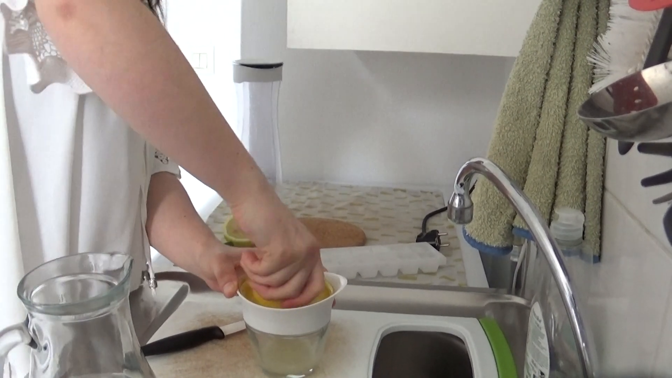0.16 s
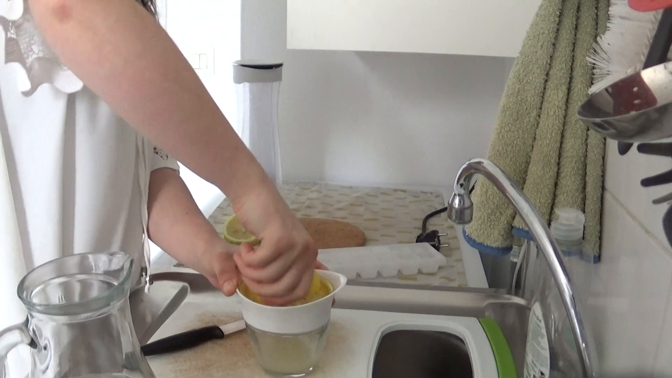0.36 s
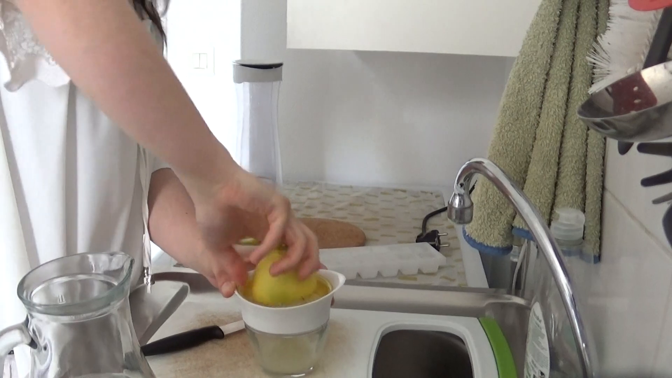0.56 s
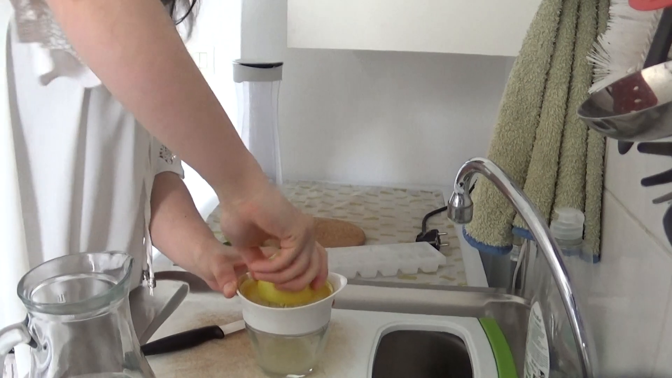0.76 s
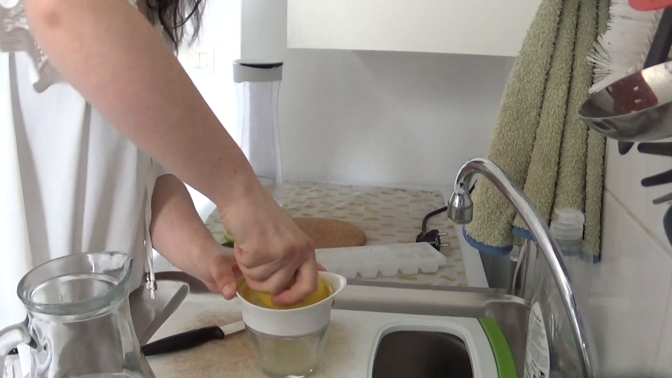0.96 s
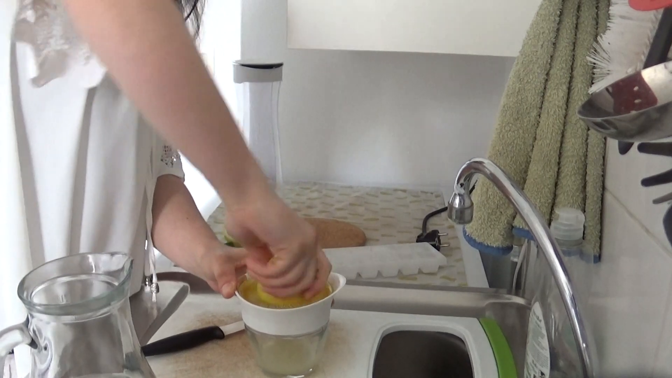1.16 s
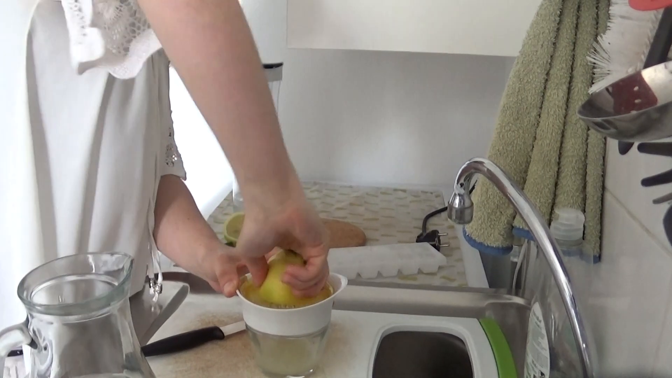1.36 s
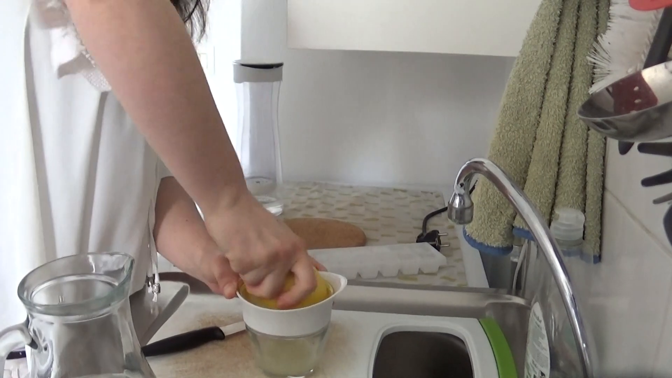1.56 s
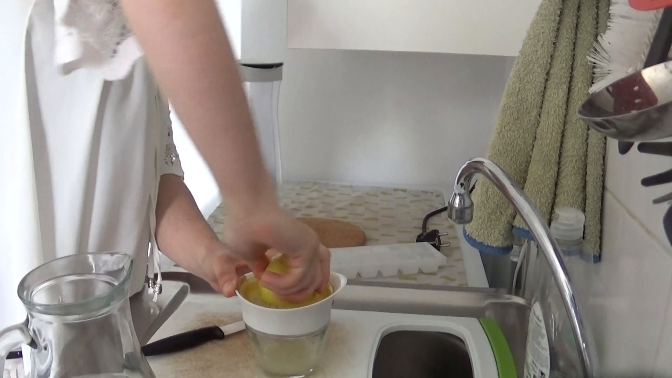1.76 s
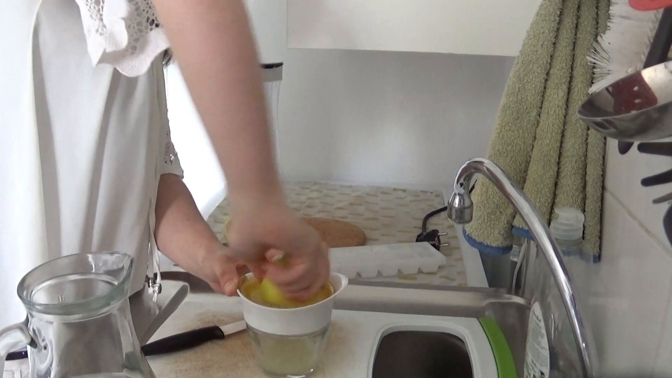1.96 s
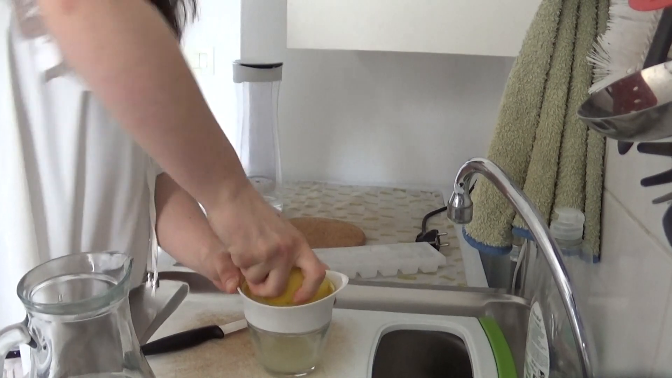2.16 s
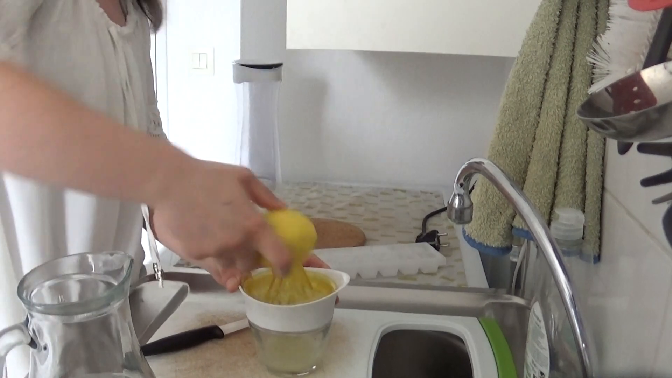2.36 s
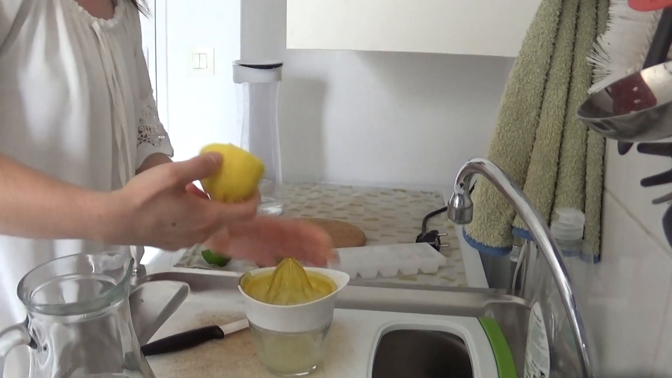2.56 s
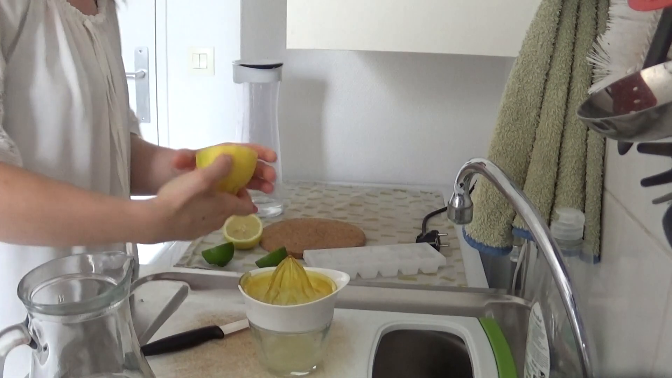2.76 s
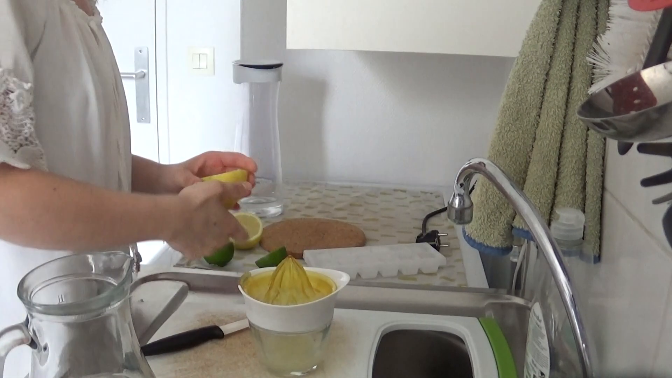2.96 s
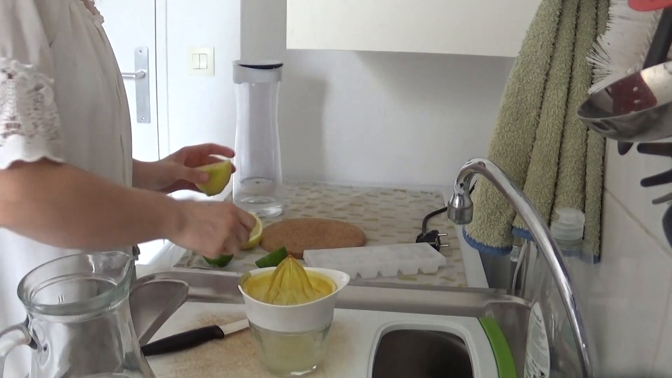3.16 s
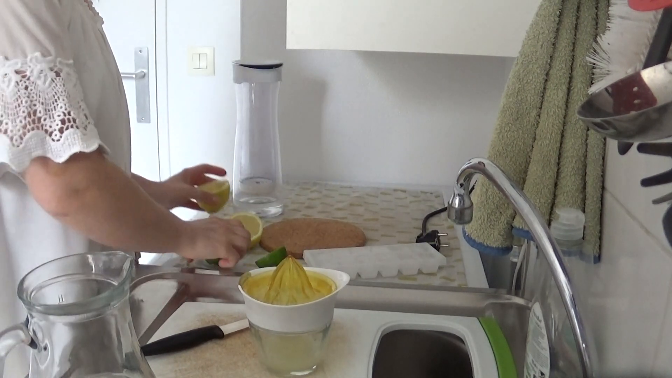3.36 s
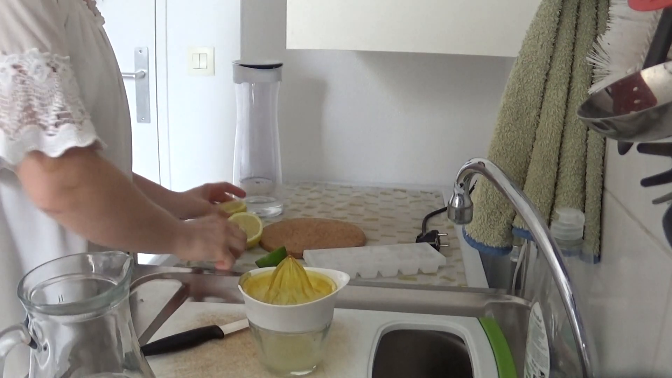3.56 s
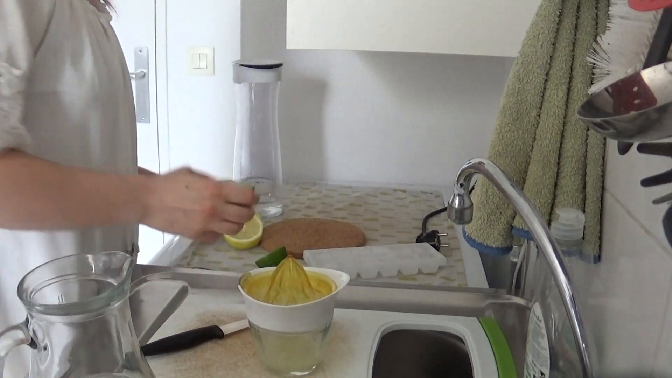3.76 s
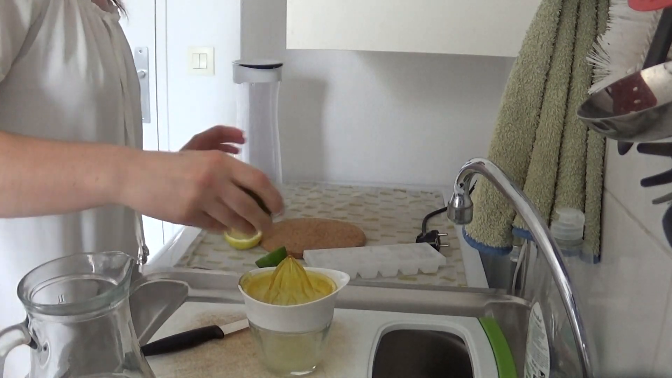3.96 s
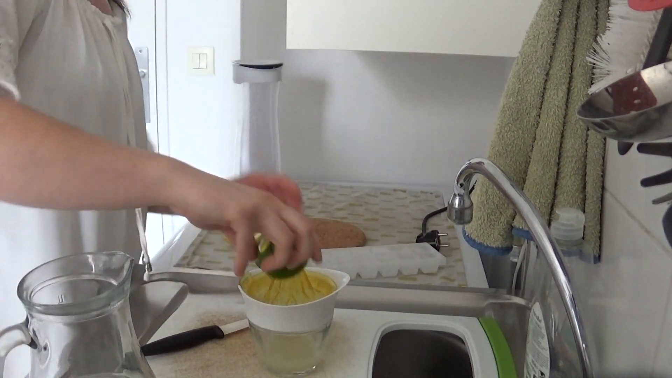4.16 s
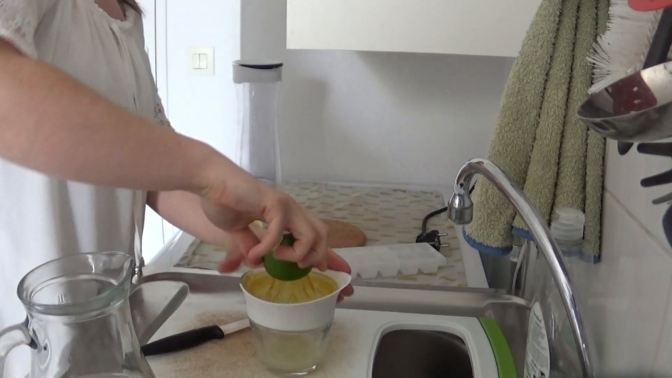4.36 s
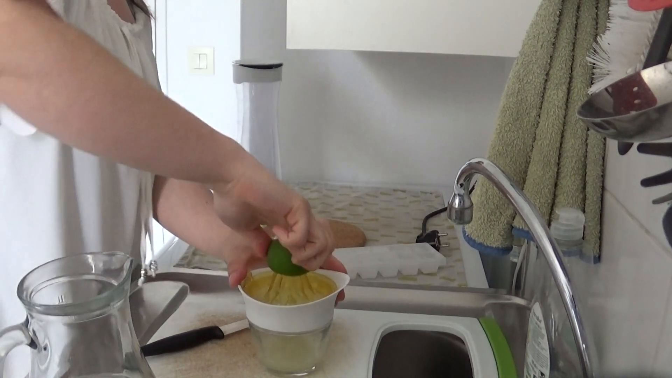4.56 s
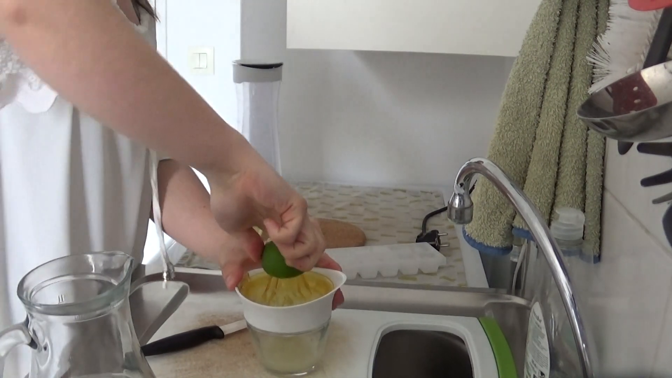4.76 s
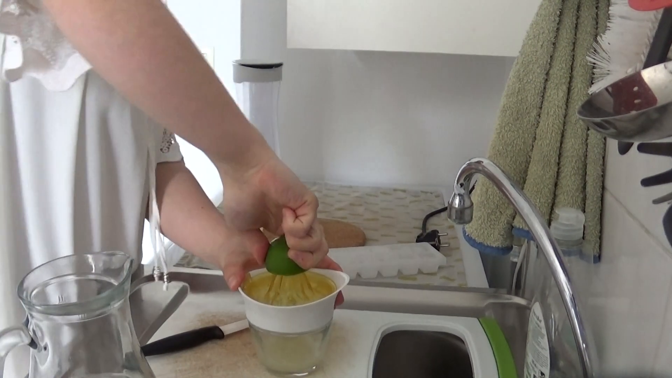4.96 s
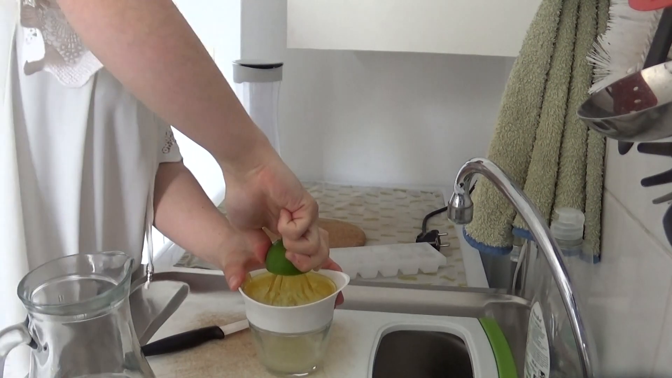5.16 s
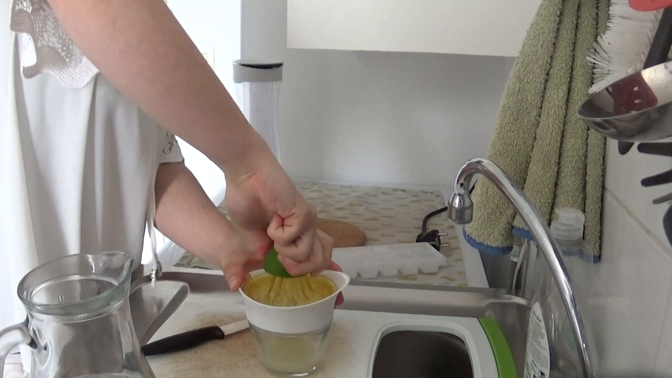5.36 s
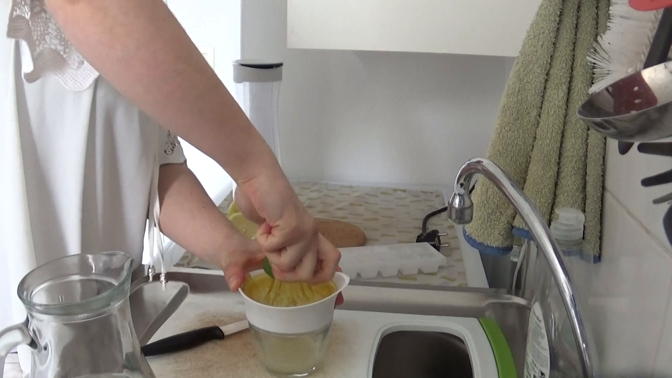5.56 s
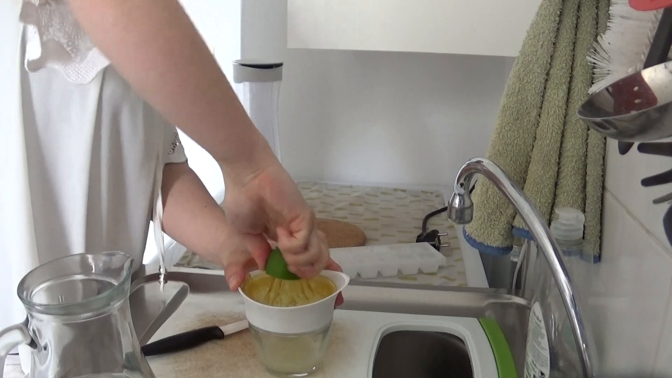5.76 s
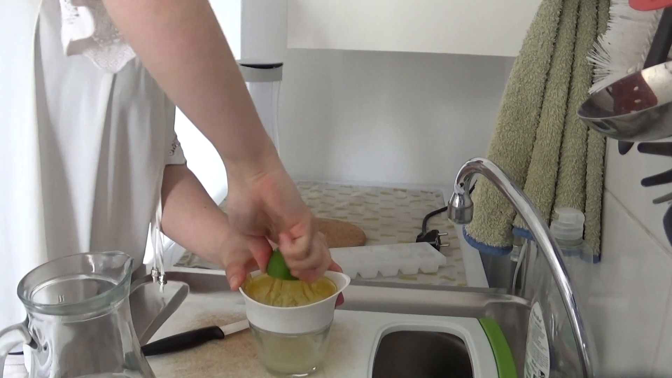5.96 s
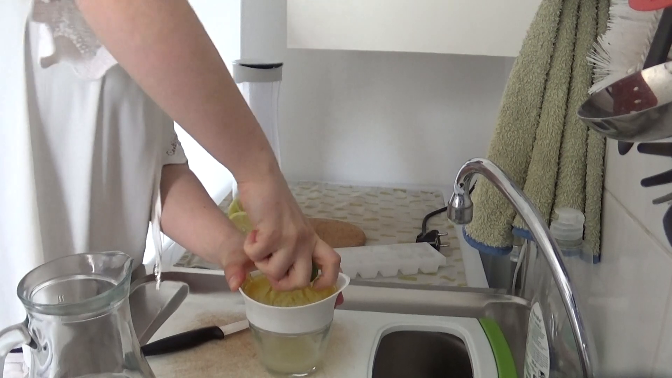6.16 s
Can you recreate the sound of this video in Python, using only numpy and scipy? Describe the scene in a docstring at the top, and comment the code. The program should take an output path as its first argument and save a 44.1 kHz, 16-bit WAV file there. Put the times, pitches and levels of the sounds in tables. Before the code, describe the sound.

A close stereo microphone in a small, short-echoing kitchen picks up a soft room hush, a barely audible thin whistle and faint, very rapid, even high ticking. From 0 to about 2.3 s, a lemon half is twisted on a plastic juicer over a glass in quick, uneven strokes: wet squelches, fizzy squirts and bubble pops over low worktop and glass bumps. Soft thuds land around 0.2, 0.7 and 0.9 s; the juiciest stroke comes near 1.4 s, with a loud sharp snap at 1.55 s. Squishing fades by 2.4 s, leaving a small tap and faint rustle around 2.5 s. At 3.6 s the spent half drops with a strong, hollow thud. Light handling bumps follow from 3.9 to 4.6 s. From 4.75 s to the end at roughly 6 s, a hard lime grips and slips in dry plastic clicks and glassy rattles, densest and loudest after 5.2 s, with slight wetness and a late knock near 6.1 s.

```python
"""Citrus pressed by hand

Citrus halves are twisted on a plastic juicer that stands on a glass in a small kitchen: a soft lemon, then a hard lime.
Pulp squishes as trains of short rising bubble tones; pops and faint rustles add tones and puffs of noise.
The rind bumps and slips over the ribs, ringing worktop, glass and plastic as dying sines; a spent half is dropped.
Under it lie a hush of shaped noise, a faint whistle that comes and goes and a steady ticking."""
import sys
import numpy as np
from scipy import signal
from scipy.io import wavfile
from scipy.ndimage import uniform_filter1d

SR = 44100
rng = np.random.default_rng(int(sys.argv[2]) if len(sys.argv) > 2 else 0)


def put_to_file(sound):
    """Save the sound as 16-bit audio at rate SR, in the file named by the first command-line argument."""
    columns = np.atleast_2d(sound).T  # one column per channel
    safe = np.clip(columns, -1, 1)
    whole_steps = np.round(safe * 32767)
    wavfile.write(sys.argv[1], SR, whole_steps.astype(np.int16))


def elevation(decibels):
    """Turn decibel levels (scalar or array-like) into linear amplitude ratios."""
    levels = np.asarray(decibels, float)
    return 10 ** (levels / 20)


N = 274302  # length [samples]


def evened(x):
    """Scales to rms 1."""
    return x / np.sqrt(np.mean(x ** 2) + 1e-20)


def read(points, hz):
    """Reads a spectrum table on a log-frequency axis."""
    f, value = np.transpose(points)
    return np.interp(np.log(hz + 1), np.log(f + 1), value)


def add(mix, s, sound):
    """Mixes a sound in at s seconds."""
    part = mix[round(s * SR):][:len(sound)]
    part += sound[:len(part)]


def wander(step):
    """A slow random curve with a fresh normal value every step samples."""
    return np.interp(np.arange(N), np.arange(0, N + step, step), rng.standard_normal(N // step + 2))


def paired(shape, likeness, size):
    """Two channels of noise from a bins x frames magnitude, alike as far as the table says."""
    a, b, c, d = rng.standard_normal((4,) + shape.shape[::-1]).transpose(0, 2, 1)
    same = np.clip(read(likeness, np.fft.rfftfreq(size, 1 / SR)), 0, 1)[:, None]
    mid = np.sqrt(1 + same) * (a + 1j * b)
    side = np.sqrt(1 - same) * (c + 1j * d)
    return signal.istft(np.array([mid + side, mid - side]) * shape, nperseg=size)[1]


def clicks(per_s, spread_db):
    """Sparse random clicks of either sign; a few are large."""
    chance, size, sign = rng.random((3, N))
    strength = elevation(spread_db * np.minimum(-np.log(size + 1e-9), 4))
    return (chance < per_s / SR) * strength * np.sign(sign - 0.5)


def ring(modes, damping):
    """Dying sines of a struck body, all starting from rest; damping shortens every decay."""
    t = np.arange(SR // 2) / SR
    return -sum(elevation(db - 60 * t * damping / t60) * np.sin(2 * np.pi * hz * t) for hz, db, t60 in modes)


def shaken(modes, per_s, spread_db, soft, damping):
    """Random bumps, rounded over soft samples, ring a body at a steady mean level."""
    bumps = signal.oaconvolve(clicks(per_s, spread_db), signal.windows.hann(soft))[:N]
    rung = signal.oaconvolve(bumps, ring(modes, damping))[:N]
    return rung / np.sqrt(uniform_filter1d(rung ** 2, 8000) + 1e-12)


def bubble(hz, turns, glide):
    """A few dying cycles; glide raises the pitch as the bubble opens."""
    u = np.arange(int(3 * turns * SR / hz) + 8) * hz / SR / turns
    envelope = (1 - np.exp(-u * 12)) * np.exp(-2.2 * u)
    return envelope * np.sin(2 * np.pi * turns * (u + glide * u ** 2))


def spray(low_hz, high_hz, t60):
    """A dying puff of noise in one band, a quarter of a second at most."""
    band = signal.butter(2, [low_hz, min(high_hz, 15000)], "bandpass", fs=SR, output="sos")
    t = np.arange(SR // 4) / SR
    return evened(signal.sosfilt(band, rng.standard_normal(len(t)))) * elevation(-60 * t / t60)


# colour of the room's hush: (frequency [Hz], relative level [dB])
HUSH_COLOUR = [(15, -18), (25, -1), (157, 2.5), (217, -9.5), (256, 4.5), (363, -4), (1160, -12.5),
               (2410, -17), (3520, -18.5), (4610, -22), (7310, -21.5), (16000, -33)]
# left-right likeness of the hush: (frequency [Hz], likeness [0 to 1])
HUSH_LIKENESS = [(60, 1), (180, 1), (550, 0.76), (1650, 0.29), (4970, 0.61), (15000, 1)]


def hush():
    """Air and appliances of the house with a fine hiss: shaped noise in faint drifting patches."""
    level_db = -53.5  # rms
    frames, hz = N // 1024 + 3, np.fft.rfftfreq(2048, 1 / SR)
    grain = rng.standard_normal((frames, 1025))
    patches = evened(uniform_filter1d(uniform_filter1d(grain, 4, 0), 9, 1)).T
    magnitude = elevation(read(HUSH_COLOUR, hz)[:, None] + 1.5 * patches)
    return elevation(level_db) * evened(paired(magnitude, HUSH_LIKENESS, size=2048)[:, :N])


def whistle():
    """A faint narrow whistle in the room comes and goes: band noise at a wandering level."""
    band = signal.butter(2, [2700, 2830], "bandpass", fs=SR, output="sos")
    level_db = -78.5 + 3.7 * wander(1800)
    return elevation(level_db) * evened(signal.sosfilt(band, rng.standard_normal(N)))


def ticking():
    """A small motor close by gives a short pure pip at an even rate, each of its own strength."""
    ticks_per_s, first_tick_s, pip_hz, pip_width_s = 25, 0.029, 3520, 0.004
    t = np.arange(N) / SR
    beats = (t - first_tick_s) * ticks_per_s + 0.5
    since_s = (beats % 1 - 0.5) / ticks_per_s
    count = np.floor(beats).astype(int)
    strength = elevation(1.2 * rng.standard_normal(count.max() + 2))[count]
    pip = np.exp(-(since_s / pip_width_s) ** 2) * np.cos(2 * np.pi * pip_hz * since_s)
    balance = elevation(np.array([[1.2], [-1.2]]))  # a little to the left
    return elevation(-56.5) * strength * pip * balance


# echo decay of the kitchen: (frequency [Hz], t60 [s])
KITCHEN_DECAY = [(120, 0.35), (600, 0.33), (2300, 0.24), (12000, 0.2)]
# left-right likeness of the echo: (frequency [Hz], likeness [0 to 1])
ECHO_LIKENESS = [(60, 1), (250, 1), (700, 0.79), (2500, 0.066), (8000, 0.72), (13000, 1)]


def kitchen(x):
    """Noise tails, each band dying at its own speed, after a short gap."""
    hz, t = np.fft.rfftfreq(256, 1 / SR), np.arange(200) * 128 / SR
    thin = (hz / (hz + 500))[:, None]  # the worktop carries the bass directly, so the echo has little
    tail = paired(thin * elevation(-60 * t / read(KITCHEN_DECAY, hz)[:, None]), ECHO_LIKENESS, size=256)
    tail = np.pad(tail / np.linalg.norm(tail[0]), ((0, 0), (70, 0)))
    return signal.fftconvolve(x[None], tail, axes=1)[:, :N]


# turns of the wrist with the fruit on the cone:
# (start [s], length [s], juice level [dB], fine spray over coarse bubbles [dB], load level [dB])
STROKES = [(0, 0.12, -46.5, -4, -41), (0.127, 0.17, -48.5, -3.5, -39.5), (0.39, 0.11, -57, -4, -48.5),
           (0.562, 0.32, -60, 0, -48), (0.766, 0.2, -50, 0.5, -45.5), (0.884, 0.11, -43.5, -2, -37),
           (1.131, 0.18, -46.5, 2, -43), (1.426, 0.18, -37.5, -8.5, -48), (1.491, 0.095, -51, 9.5, -37.5),
           (1.721, 0.15, -44, -0.5, -40.5), (1.981, 0.092, -42, -5, -53.5), (2.021, 0.11, -44.5, 1.5, -39),
           (2.208, 0.07, -53, 1.5, -38), (2.365, 0.5, -63, -2.5, -62.5), (4.413, 0.083, -74, 3, -57),
           (5.108, 0.18, -69, 3, -60), (5.316, 0.12, -60, -2, -47), (5.429, 0.023, -66, 11, -59),
           (5.507, 0.12, -60.5, 4, -47.5), (5.725, 0.05, -66.5, 7, -51), (5.756, 0.11, -60.5, 5, -44.5),
           (5.854, 0.075, -65, 7.5, -48), (6.008, 0.17, -59.5, 2.5, -44), (6.096, 0.054, -52.5, 5, -38)]
LIME_S = 3  # strokes from here on press the hard lime, those before it the soft lemon


def control(level_db, shape):
    """Every stroke rises, sags and falls by one rule; overlapping strokes add in power."""
    lime_stops_faster = 1.56  # the dry, hard lime grips and lets go in jerks
    delay, rise, sag_db, fall = shape
    start, length = np.array(STROKES)[:, :2].T[:, :, None]
    fall = fall * np.where(start < LIME_S, 1, lime_stops_faster)
    t = np.arange(0, N, 64) / SR
    since = t - start - delay
    db = level_db[:, None] + rise * np.minimum(since, 0)
    db = db - sag_db * np.clip(since / length, 0, 1)
    db = db - fall * np.maximum(since - length, 0)
    total = np.sqrt((elevation(np.maximum(db, -200)) ** 2).sum(0))
    return np.interp(np.arange(N) / SR, t, total)


def loaded(over_db, shape):
    """How hard the load of the hand drives one body."""
    rows = np.array(STROKES)
    return control(rows[:, 4] + np.where(rows[:, 0] < LIME_S, *over_db), shape)


# modes of worktop and glass: (frequency [Hz], level [dB], t60 at damping 1 [s])
WORKTOP = [(79, -5, 0.36), (90.5, 2, 0.34), (122, 11.5, 0.055), (161.9, -1, 0.24), (181.5, 5.5, 0.081),
           (219.8, -5.5, 0.42)]
GLASS = [(258.5, 1.5, 0.21), (287.7, 5.5, 0.23), (327, 9.5, 0.11), (435.8, 4, 0.16), (470, 5.5, 0.19),
         (617, -9, 0.14)]
# how each body follows a stroke: (delay [s], rise [dB/s], sag over the stroke [dB], fall for the lemon [dB/s])
WORKTOP_SHAPE = (0.048, 240, 8.5, 96)
GLASS_SHAPE = (0.01, 310, 4.8, 180)
# drive of each body over the load: (lemon [dB], lime [dB])
WORKTOP_OVER = (2.5, -1.5)
GLASS_OVER = (-1, 0.5)


def rumble():
    """The rind bumps over the ribs; each soft bump shakes worktop and glass."""
    worktop = shaken(WORKTOP, 260, spread_db=5.0, soft=52, damping=0.9)
    glass = shaken(GLASS, 200, spread_db=3.0, soft=29, damping=3.36)
    return loaded(WORKTOP_OVER, WORKTOP_SHAPE) * worktop + loaded(GLASS_OVER, GLASS_SHAPE) * glass


# modes of the plastic juicer: (frequency [Hz], level [dB], t60 at damping 1 [s])
JUICER = [(647, 3.5, 0.043), (1058, -1, 0.063), (1274, 5.5, 0.022), (1562, 9.5, 0.013),
          (1843, 10.5, 0.0084), (2070, 5, 0.0057), (2420, 0.5, 0.049), (2503, -9.5, 0.04)]
# how the slips follow a stroke: (delay [s], rise [dB/s], sag over the stroke [dB], fall for the lemon [dB/s])
SLIP_SHAPE = (0.0022, 560, 7.4, 77)
# drive of the plastic over the load: (lemon [dB], lime [dB])
SLIP_OVER = (-10, -5)


def slips():
    """Uneven little slips of the peel ring the plastic."""
    return loaded(SLIP_OVER, SLIP_SHAPE) * shaken(JUICER, 900, spread_db=4.0, soft=5, damping=0.9)


# the hard lime slips one rib and grips again: (time [s], plastic level [dB], glass over plastic [dB])
JERKS = [(4.7595, -39, -1), (4.9436, -40, -2), (4.994, -39, -2), (5.017, -40.5, -2), (5.0539, -38.5, -10),
         (5.1301, -38.5, 2), (5.1746, -36.5, -0.5), (5.203, -32, -1.5), (5.2589, -37, -3.5),
         (5.2985, -44, 2.5), (5.3083, -33.5, -11), (5.362, -42, -13), (5.385, -33.5, -7), (5.4211, -35, -6),
         (5.442, -26.5, -13.5), (5.5125, -34.5, -12), (5.5594, -32.5, -3), (5.5961, -34, 3.5),
         (5.757, -38.5, 1.5), (5.7943, -31.5, -3.5), (5.8405, -37, -6), (5.8821, -32, 0.5),
         (5.9974, -39, -7), (6.0085, -32, -15), (6.0271, -31.5, -11), (6.14, -39, 7), (6.1694, -34, -18)]


def jerks():
    """A sharp click and a few aftershocks ring plastic and glass until the grip mutes them."""
    grip_s, release_s = 0.021, 0.0023
    out, t = np.zeros(N), np.arange(SR // 10) / SR
    muted = np.exp(-np.maximum(t - grip_s, 0) / release_s)
    for s, db, glass_db in JERKS:
        sparse = rng.standard_normal(900) * (rng.random(900) < 0.03)
        shocks = 0.54 * sparse * np.exp(-np.arange(900) / SR / 0.01)
        shocks[0] = 1
        # every jerk excites the modes in another balance
        modes = [(hz, mode_db + 2.5 * rng.standard_normal(), t60) for hz, mode_db, t60 in JUICER]
        plastic = signal.oaconvolve(ring(modes, damping=1.07), shocks)[:len(t)]
        soft_shocks = signal.oaconvolve(shocks, np.diff(signal.windows.hann(50)))
        glass = signal.oaconvolve(ring(GLASS, damping=0.49), soft_shocks)[:len(t)]
        both = plastic / abs(plastic).max() + elevation(glass_db) * glass / abs(glass).max()
        add(out, s, muted * elevation(db) * both)
    return out


# blows and jerks on juicer or worktop:
# (time [s], thud level [dB], favoured low pitch [Hz], plastic ringing over the thud [dB])
KNOCKS = [(0.193, -30, 196, -22), (0.673, -26.5, 170, -27), (0.678, -25, 82.4, -4),
          (0.813, -31.5, 258, -25), (0.887, -29.5, 200, -16), (1.55, -42, 222, 14),
          (2.507, -42.5, 480, -3.5), (3.619, -13, 181.7, -23), (3.908, -35, 172, -47),
          (3.975, -44, 198, -33), (4.301, -43.5, 86.5, -20), (4.411, -43.5, 141, -5),
          (4.469, -36.5, 90, -37), (4.581, -38.5, 105, -22), (4.764, -47, 79, -23), (4.853, -38, 122, -22),
          (6.091, -26, 282, -9)]


def knocks():
    """A soft bouncing push rings the low modes near its own pitch; glass and plastic chatter for a few ms."""
    out = np.zeros(N)
    for s, db, low_hz, hard_db in KNOCKS:
        u = np.arange(0, 1, low_hz / SR / 2.295)
        push = np.sin(np.pi * u) * np.sin(2 * np.pi * 2.383 * u)
        thud = signal.oaconvolve(ring(WORKTOP, damping=1.25) + ring(GLASS, damping=1.04), push)
        chatter = rng.standard_normal(900) ** 3 * np.exp(-np.arange(900) / SR / 0.013)
        chatter[0] += 8.0  # the first contact is usually the sharpest
        plastic = signal.oaconvolve(ring(JUICER, damping=7.2), chatter)
        rattle = signal.oaconvolve(ring(GLASS, damping=0.73), chatter)
        add(out, s, elevation(db) * thud / abs(thud).max())
        add(out, s + 0.00268, elevation(db + 0.49 * hard_db - 4.0) * rattle / abs(rattle).max())
        add(out, s + 0.00289, elevation(db + hard_db) * plastic / abs(plastic).max())
        add(out, s + 0.00264, elevation(db + hard_db - 11.0) * spray(470, 1730, t60=0.24))  # wet slap of the peel
    return out


# colour of the squish: (frequency [Hz], relative level [dB])
SQUISH_COLOUR = [(1600, -1), (2500, 5.5), (4000, 1.5), (6500, -2), (9000, 4), (11500, -38), (14000, -32)]
# how juice and spray follow a stroke: (delay [s], rise [dB/s], sag over the stroke [dB], fall for the lemon [dB/s])
JUICE_SHAPE = (0.0043, 690, 3.6, 180)
SPRAY_SHAPE = (0.0019, 650, 4.8, 193)


def squish():
    """Dense bubbles of all sizes in short squirts; the small ones follow the fine spray."""
    out, rows = np.zeros(N), np.array(STROKES)
    juice = control(rows[:, 2], JUICE_SHAPE)
    mist = control(rows[:, 2] + rows[:, 3], SPRAY_SHAPE)
    for hz in np.geomspace(1600, 14000, 24):
        clump = wander(250)  # squirts last a few ms
        drift = wander(2200)  # pockets of pulp change the colour
        bursts = clicks(160, 2.47) * elevation(4.0 * clump + 3.45 * drift)
        train = evened(signal.oaconvolve(bursts, bubble(hz, turns=3.2, glide=0.018))[:N])
        fine = np.clip(np.log2(hz / 4000) / 0.91, 0, 1)  # 0 = coarse bubble, 1 = fine spray
        level = elevation(read(SQUISH_COLOUR, hz) - 13.0) * np.sqrt(hz / 4000)
        out += level * juice ** (1 - fine) * mist ** fine * train
    return out


# a faint clink and rustles near 5 kHz: (time [s], level [dB], pitch [Hz], t60 [s])
RUSTLES = [(.19, -43, 4880, 0.36), (2.585, -55.5, 5300, .06), (2.88, -66.5, 4860, 2)]


def rustles():
    """A faint clink and rustles near 5 kHz: narrow dying noise."""
    out = np.zeros(N)
    for s, db, hz, t60 in RUSTLES:
        add(out, s, elevation(db) * spray(hz / 1.05, hz * 1.05, t60))
    return out


def crack():
    """A pip snaps against a rib: a very short tone and a wide puff."""
    out, s, db = np.zeros(N), 1.5497, -2
    add(out, s, elevation(db) * bubble(2600, turns=1, glide=0))
    add(out, s, elevation(db - 12.5) * spray(750, 6300, t60=0.018))
    return out


# single bursting bubbles and tearing pulp: (time [s], relative level [dB], pitch [Hz])
POPS = [(0.051, -25, 4130), (0.095, -27, 4960), (0.123, -26, 3870), (0.1903, -17.5, 4230),
        (0.447, -31.5, 6200), (0.661, -26.5, 7360), (0.775, -29, 3980), (0.874, -17.5, 4400),
        (0.8883, -11, 2480), (1.136, -27, 8600), (1.2357, -22.5, 10500), (1.2707, -15, 4930),
        (1.4163, -15, 5300), (1.421, -18.5, 6030), (1.4425, -14.5, 4000), (1.448, -17.5, 4300),
        (1.4813, -12.5, 6600), (1.493, -27, 10500), (1.523, -26, 2460), (1.566, -17, 4100),
        (1.73, -19, 3780), (1.761, -17, 3120), (1.788, -20, 5860), (1.801, -17.5, 6500),
        (1.8335, -15, 6860), (1.953, -29.5, 6550), (2.0447, -19, 3860), (2.068, -20.5, 3880),
        (2.232, -24.5, 3580), (2.4215, -34, 7800), (4.809, -41, 8700), (4.887, -36.5, 9500),
        (4.992, -37, 9100), (5.017, -39, 9090), (5.178, -39, 7200), (5.3, -32.5, 7050),
        (5.336, -32.5, 8900), (5.442, -34, 3750), (5.536, -34, 7940), (5.5602, -27.5, 8600),
        (5.843, -30, 7300), (5.882, -31.5, 3970), (6.013, -34, 7700), (6.141, -33.5, 6640),
        (6.17, -27.5, 5500)]


def pops():
    """Each bubble bursts in a few cycles and throws a spray around its pitch."""
    out, wide = np.zeros(N), 1.22
    for s, db, hz in POPS:
        add(out, s, elevation(db - 2.0) * bubble(hz, turns=2.6, glide=0.0095))
        add(out, s, elevation(db - 16.0) * spray(hz / wide, hz * wide, t60=0.03))
        add(out, s, elevation(db - 14.0) * spray(1340, 10300, t60=0.012))  # the skin tears with a wide click
    # the pops carry nothing above 11 kHz
    return signal.sosfilt(signal.butter(6, 11000, fs=SR, output="sos"), out)


def scene():
    """All that the hands do, direct and echoed, over hush, ticking and whistle."""
    hands = rumble() + slips() + squish() + pops() + crack() + rustles() + knocks() + jerks()
    # small bodies radiate no deep bass
    hands = signal.sosfilt(signal.butter(6, 70, "highpass", fs=SR, output="sos"), hands)
    return hands + elevation(-3.0) * kitchen(hands) + hush() + ticking() + whistle()


def low_pass(x):
    """Removes everything above the highest recorded frequency."""
    return signal.sosfilt(signal.butter(12, 15830, fs=SR, output="sos"), x)


def record(dry):
    """Hands on the finished mix."""
    return low_pass(dry)


dry = scene()
out = record(dry)
put_to_file(out)
```